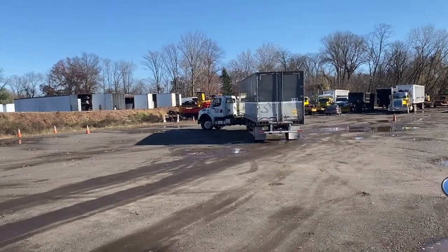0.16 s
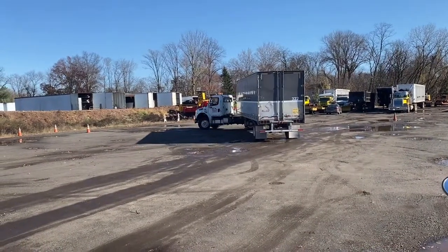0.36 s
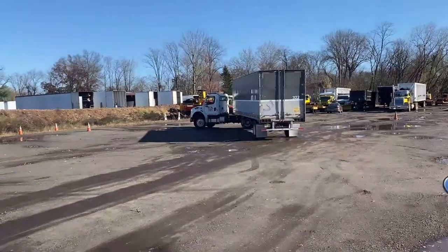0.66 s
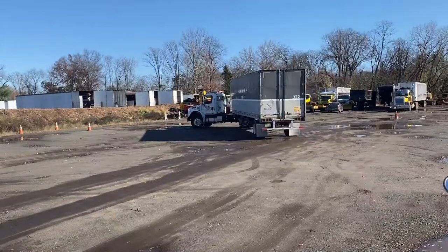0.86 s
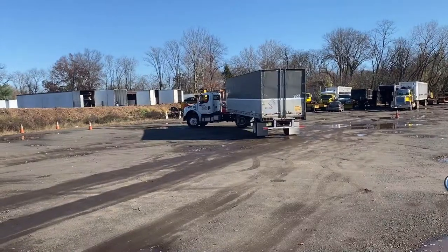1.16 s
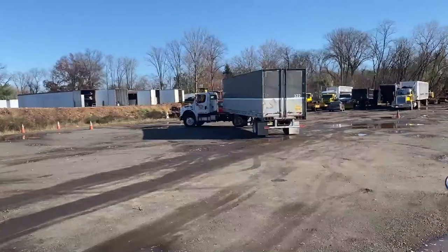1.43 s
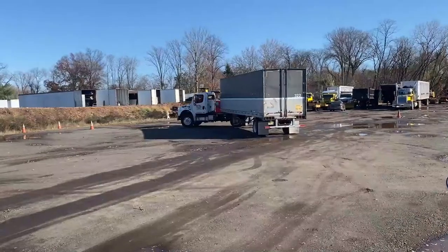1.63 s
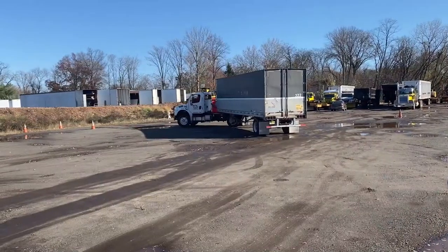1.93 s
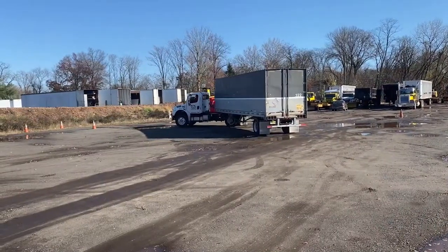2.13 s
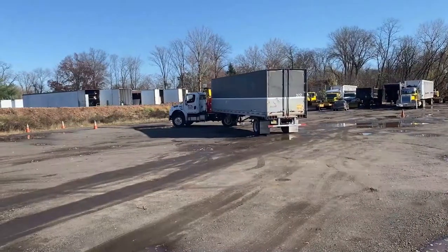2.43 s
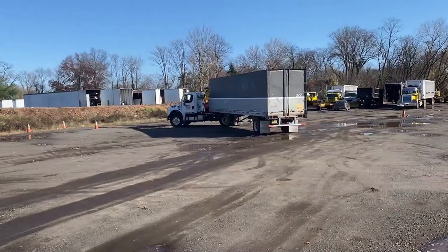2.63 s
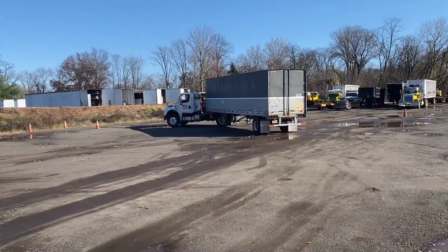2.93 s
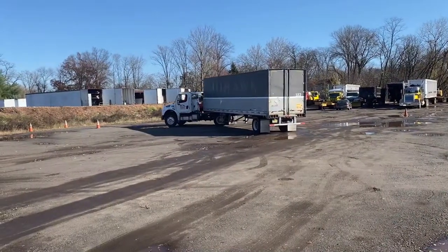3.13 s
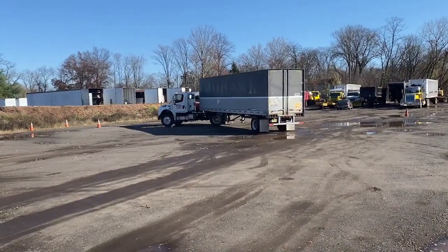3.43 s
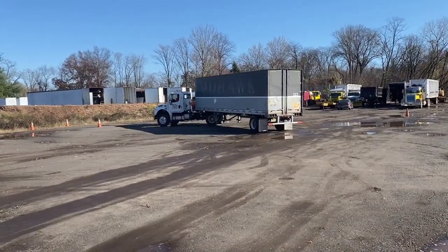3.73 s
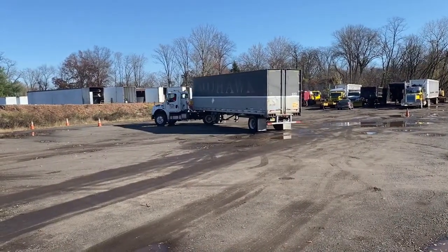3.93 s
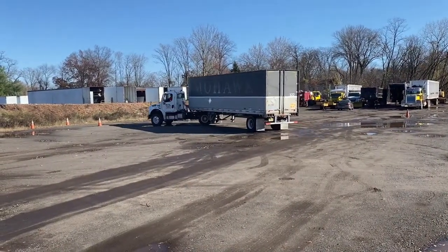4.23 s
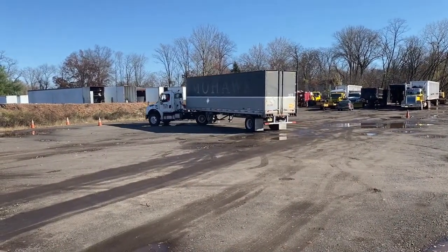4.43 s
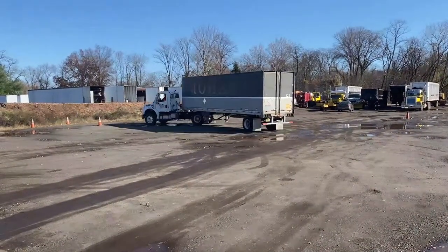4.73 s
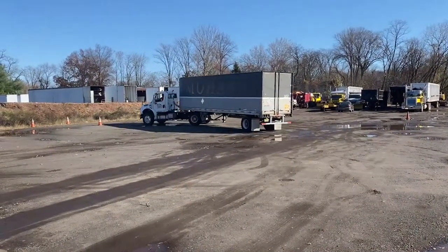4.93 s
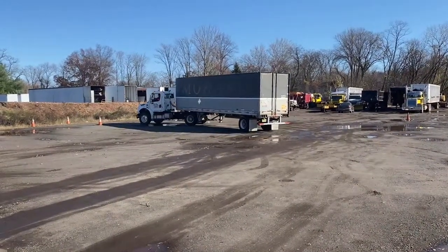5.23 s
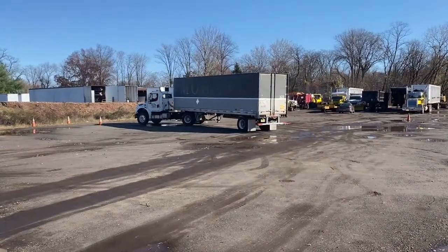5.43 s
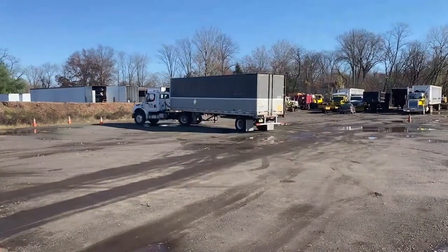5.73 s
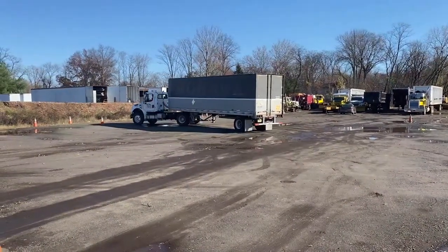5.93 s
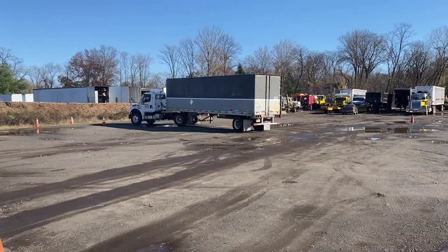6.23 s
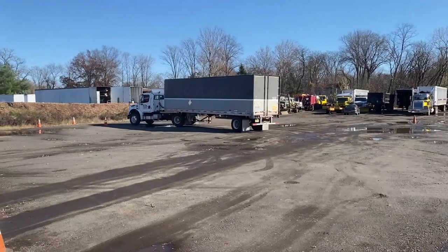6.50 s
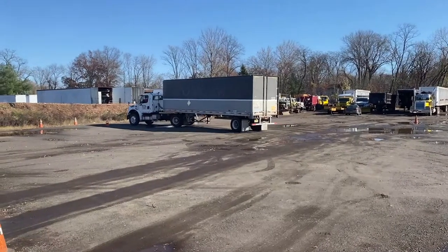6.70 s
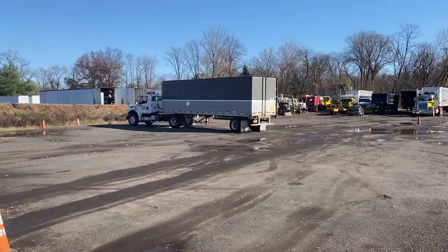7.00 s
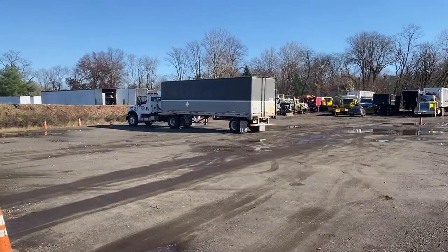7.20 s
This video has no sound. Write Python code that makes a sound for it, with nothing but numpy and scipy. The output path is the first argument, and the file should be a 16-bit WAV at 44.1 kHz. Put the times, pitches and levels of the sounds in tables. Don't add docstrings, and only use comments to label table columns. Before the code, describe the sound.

Outdoors in an open yard, a heavy diesel idles some thirty metres away, faint at first under flapping wind gusts on a phone microphone. As it turns, the exhaust boom, block knock, gear whine and panel buzz come forward. Dry trailer ticks and brief suspension squeaks follow mid-way, then wind thumps return strongly and brake air starts hissing at the very end.

```python
import sys
import numpy as np
from scipy import signal
from scipy.fft import rfft, irfft, next_fast_len
from scipy.io import wavfile
from scipy.ndimage import uniform_filter1d

SR = 44100
rng = np.random.default_rng(int(sys.argv[2]) if len(sys.argv) > 2 else 0)


def to_wav(s):
    ch = np.atleast_2d(s).T
    pcm = np.round(np.clip(ch, -1, 1) * 32767)
    wavfile.write(sys.argv[1], SR, pcm.astype(np.int16))


def attenuation_scalar(level_db):
    decades = np.asarray(level_db, float) / 20
    return 10 ** decades


N = 324576
T = np.arange(N) / SR
PAD = next_fast_len(N + int(SR) // 4)
HZ = np.maximum(np.fft.rfftfreq(PAD, 1 / SR), 1.)


def unit(x):
    return x / np.sqrt(np.mean(x ** 2))


def curves(table):
    s, *columns = np.transpose(table)
    return [np.interp(T, s, c) for c in columns]


def over_hz(table):
    hz, *columns = np.transpose(table)
    return [np.interp(np.log(HZ), np.log(hz), c) for c in columns]


def shape(x, gain):
    return irfft(rfft(x, PAD) * gain, PAD)[:N]


def low_pass(hz):
    return 1 / np.sqrt(1 + (HZ / hz) ** 8)


def band(x, hz, width_hz, order=1):
    b, a = signal.iirpeak(hz, hz / width_hz, fs=SR)
    for _ in range(order):
        x = signal.lfilter(b, a, x)
    return x


def steep(x, lo_hz, hi_hz):
    return signal.sosfilt(signal.butter(4, [lo_hz, hi_hz], "band", fs=SR, output="sos"), x)


def walk(rate):
    k = int(SR / rate)
    held = np.repeat(rng.standard_normal(N // k + 1), k)
    return 1.29 * uniform_filter1d(uniform_filter1d(held, k), k)[:N]


def add(out, at_s, burst):
    i = int(at_s * SR)
    out[i:i + len(burst)] += burst[:N - i]


def tone(hz, db, wobble, flicker_db, rate):
    level = np.sqrt(2) * attenuation_scalar(db + flicker_db * walk(rate))
    cycles = np.cumsum(hz * (1 + wobble * walk(rate))) / SR
    return level * np.sin(2 * np.pi * cycles)


def turned(away_db, facing_db):
    start_s, length_s = 1.92, 2.35
    return np.interp(T, [start_s, start_s + length_s], [away_db, facing_db])


# t/s, level/dB, brightness/dB
TRUCK = [
    (0, -61.5, -19),
    (.7, -61.5, -17),
    (1.75, -56.5, -13),
    (2, -51.5, -17),
    (3.2, -49.5, -15),
    (3.8, -48.5, -16),
    (5.6, -47, -17.5),
    (7, -44, -17),
    (7.36, -42, -15),
]


def engine_level():
    return curves(TRUCK)


CYLINDER_DB = [2, -4, 0, -5, 1, -2]


def firings():
    firing_hz = 38.75
    turns = np.cumsum(firing_hz * (1 + 0.002828 * walk(3))) / SR
    firing = turns.astype(int)
    uneven_db = rng.uniform(-4, 4, N // 500)[firing]
    size = attenuation_scalar(np.array(CYLINDER_DB)[firing % len(CYLINDER_DB)] + uneven_db)
    pulses = size * (np.diff(firing, prepend=0) > 0)
    return turns, size, pulses


# multiple of firing rate/x, level over the exhaust/dB
ORDERS_DB = [(2, -3.5), (3, -25.5), (4, -4.5), (5, -7), (7, -11), (8, -9)]
# f/Hz, width/Hz, level/dB
EXHAUST = [(73, 65, -2), (179, 55, -2), (262, 88, -4), (319, 58, -3), (409, 53, -8)]


def exhaust(turns, pulses):
    gas = unit(pulses) * 0.36 + rng.standard_normal(N)
    boom = 0
    for k, (hz, width_hz, db) in enumerate(EXHAUST):
        boom = boom + (-1) ** k * attenuation_scalar(db + 2.6 * walk(9)) * band(gas, hz, width_hz)
    muffler_hz, pipe_low_hz = 700, 58
    boom = shape(unit(boom), low_pass(muffler_hz) / np.sqrt(1 + (pipe_low_hz / HZ) ** 8))
    orders = 0
    for k, db in ORDERS_DB:
        orders = orders + attenuation_scalar(db + 3.85 * walk(11)) * np.sin(2 * np.pi * (k * turns + rng.random()))
    over_block_db = turned(-3.5, 4)
    return attenuation_scalar(engine_level()[0] + over_block_db) * (boom + orders)


# f/Hz, level per Hz/dB
BLOCK = [(300, -4.5), (480, 2.5), (640, -1.5), (820, 4), (1000, -3), (1300, -1.5), (1750, -7), (2500, -10),
         (3000, -20), (4200, -20.5), (5200, -27), (8000, -27), (11000, -36), (15500, -39)]
# f/Hz, width/Hz, level over the colour/dB
PANELS = [(840, 22.5, 7.3), (1145, 22, 3.5), (2495, 210, 4.3), (3000, 340, 0.72), (3260, 350, 2.1),
          (4200, 560, 0.4), (4820, 670, 5.4), (5370, 220, 2.8)]


def block(turns, size):
    knock_db, bright_db = engine_level()
    colour = attenuation_scalar(over_hz(BLOCK)[0])
    for hz, width_hz, db in PANELS:
        colour = colour * attenuation_scalar(db / (1 + (2 * (HZ - hz) / width_hz) ** 2))
    gate = size * np.exp(-(turns % 1) / 0.74)
    knock, shimmer = 0, walk(11)
    octaves = [(200, 1200, 1.8), (966, 2020, 0.95), (1770, 3030, 2.1),
               (3280, 4580, 0.88), (5880, 8640, 1.8), (8560, 13000, 1.5)]
    for lo_hz, hi_hz, fill in octaves:
        share = np.sqrt(1 / (1 + (lo_hz / HZ) ** 8) - 1 / (1 + (hi_hz / HZ) ** 8))
        rattle = (gate + fill) / (fill + 0.23) * rng.standard_normal(N)
        moving = attenuation_scalar(1.1 * walk(14) + 1.0 * shimmer)
        brightness = attenuation_scalar((bright_db + 18.0) * (lo_hz > 3000))
        knock = knock + shape(rattle, colour * share) * moving * brightness
    return attenuation_scalar(knock_db) * knock / np.sqrt(np.mean(colour ** 2))


def truck():
    turns, size, pulses = firings()
    return exhaust(turns, pulses) + block(turns, size)


# f/Hz, width/Hz, level over the block before the turn/dB, and after it/dB
BUZZ = [(3320, 440, -34, -19.5), (4800, 540, -31, -26), (2477, 250, -13, -19), (5470, 900, -25, -29),
        (3000, 1400, -19.5, -28)]


def buzz():
    out = 0
    for hz, width_hz, away_db, facing_db in BUZZ:
        level = attenuation_scalar(engine_level()[0] + turned(away_db, facing_db) + 2.1 * walk(10))
        out = out + level * unit(band(rng.standard_normal(N), hz, width_hz, order=2))
    return out


def wake(eddies, over_db, fade_s):
    build_s, lead_s = 0.0076, .08
    out, late = np.zeros(N), T[:12000] - lead_s
    puff = np.exp(2 * np.minimum(late / build_s, -late / fade_s))
    for s, db, hz in eddies:
        add(out, s + 1 / hz - lead_s, attenuation_scalar(2 * (db + over_db)) * puff)
    return out


# t/s, rumble level/dB
BREEZE = [(0, -48), (.7, -50), (1.9, -52.5), (2.6, -56), (3.3, -48.5), (4, -49), (5.7, -43), (6.4, -39.5),
          (6.8, -36.5), (7.24, -32), (7.36, -32.5)]
# t/s, peak level/dB, starting f/Hz
THUMPS = [(0.103, -30.5, 96), (.21, -33.5, 98), (0.32, -17, 123), (.457, -30, 86), (0.499, -21, 109.5),
          (0.515, -36, 84.5), (.64, -36.5, 99), (0.729, -44, 99.4), (0.754, -41, 121), (0.982, -34.5, 141),
          (1.192, -41.5, 90), (1.295, -39, 112), (1.953, -36, 114), (2.078, -39, 120), (2.133, -36, 109),
          (2.184, -46, 120), (2.291, -33, 108), (2.316, -51, 100), (2.445, -41, 110), (2.622, -33, 124),
          (2.636, -39.5, 110), (2.789, -34, 94.5), (2.814, -40, 130), (2.83, -42, 110), (4.116, -29.5, 105),
          (4.362, -31.5, 109), (5.79, -24.5, 132), (5.837, -22, 99), (5.849, -31, 110), (5.876, -21, 111),
          (5.959, -19.5, 123), (6.038, -28, 110), (6.09, -27, 90), (6.138, -18, 121), (6.181, -23.5, 117),
          (6.243, -24, 93), (6.316, -31.5, 84.7), (6.384, -26, 105), (6.486, -21.5, 99), (6.507, -20, 85),
          (6.535, -24, 150), (6.542, -19.5, 262), (6.544, -21.5, 142), (6.555, -17.5, 98.5),
          (6.589, -26, 150), (6.618, -23, 79.4), (6.652, -27, 86), (6.72, -31.5, 190), (6.894, -24.5, 98),
          (6.95, -27, 98), (7.121, -18, 89), (7.15, -32, 222), (7.181, -4, 131.5), (7.193, -7.5, 113.4),
          (7.213, -11, 167), (7.223, -16.5, 113), (7.234, -23, 83.6), (7.26, -19, 124), (7.288, -17, 127)]
# t/s, peak level/dB, starting f/Hz
BUFFETS = [(0.298, -27, 352), (.312, -18, 510), (0.337, -18.5, 525), (.352, -19.5, 330), (.366, -12.5, 330),
           (.369, -22, 760), (0.377, -17.5, 322), (.378, -23, 700), (.392, -40, 330), (0.404, -30, 460),
           (.409, -20.5, 260), (.42, -16, 206), (0.43, -23.5, 600), (.442, -12.5, 423), (.445, -19, 840),
           (0.453, -27.5, 374), (0.477, -27, 350), (.491, -25.5, 915), (.493, -11, 562), (.519, -36, 414),
           (.545, -40.5, 280), (0.586, -28.5, 317), (.591, -38, 645), (.604, -34, 250), (0.728, -48, 330),
           (0.74, -38, 450), (0.747, -32, 334), (.755, -29.5, 760), (.757, -29, 1410), (.764, -33.5, 330),
           (.768, -44, 600), (0.792, -45, 300), (0.804, -38.5, 450), (0.818, -47, 230), (.86, -42, 386),
           (.873, -35, 305), (0.925, -40, 620), (.973, -31.5, 775), (0.975, -30, 330), (0.996, -45.5, 380),
           (1.161, -32, 300), (1.17, -47, 262), (1.256, -45, 420), (1.264, -35, 261), (1.275, -32, 432),
           (1.337, -36, 336), (1.57, -40, 300), (1.945, -35.5, 200), (2.069, -32, 330), (2.157, -28.5, 251),
           (2.164, -36, 330), (2.18, -32.5, 300), (2.258, -44, 330), (2.384, -44, 330), (2.499, -33, 257),
           (2.509, -34, 300), (2.876, -36, 330), (2.96, -36, 382), (6.527, -17.5, 370), (7.165, -4.5, 269)]


def wind():
    breeze = attenuation_scalar(2 * curves(BREEZE)[0])
    wake_s, spit_s = 0.029, 0.0037
    low = np.sqrt(breeze + wake(THUMPS, -10.5, wake_s) + wake(BUFFETS, -12.5, wake_s))
    mid = np.sqrt(breeze * attenuation_scalar(2 * -1.5) + wake(THUMPS, -16, wake_s) + wake(BUFFETS, -13.5, wake_s))
    edge_on = [row for row in BUFFETS if row[0] < 1.1]
    spit = np.sqrt(wake(edge_on, -13, spit_s))
    lumps = walk(28)
    rumble = unit(steep(rng.standard_normal(N), 29.4, 127.4)) * attenuation_scalar(1.35 * lumps)
    flutter = unit(steep(rng.standard_normal(N), 134.0, 377.0)) * attenuation_scalar(2.0 * lumps + 1.4 * walk(55))
    fast = unit(band(steep(rng.standard_normal(N), 300.0, 866.0), 466.0, 140.0)) * attenuation_scalar(3.5 * walk(91.2))
    out = attenuation_scalar(-1.5) * (low * rumble + attenuation_scalar(-6.0) * mid * flutter) + attenuation_scalar(-2.0) * spit * fast
    t = T[:4000]
    for s, db, hz in THUMPS + BUFFETS:
        cycles = np.cumsum(hz * (0.33 + 0.78 * np.exp(-t * hz / 2.5))) / SR
        swell = cycles ** 2 * np.exp(2 - 2 * cycles / 0.94)
        add(out, s, attenuation_scalar(db - 1.5) * np.sin(2 * np.pi * cycles) * swell)
    port_top_hz = 1250
    return shape(out, low_pass(port_top_hz))


# t/s, peak level/dB, f/Hz, width/Hz
TICKS = [(.613, -70, 7800, 2500), (0.755, -52, 2200, 3000), (0.922, -56, 4430, 2000),
         (2.709, -53, 11000, 12000), (3.04, -62, 11500, 4000), (3.049, -44, 6500, 9000),
         (3.0495, -54, 13600, 5000), (3.158, -52, 7000, 4000), (3.255, -47.5, 7200, 2500),
         (3.257, -49, 4720, 1800), (3.296, -47.5, 4600, 1300), (3.303, -45, 4800, 1500),
         (3.304, -55, 7400, 2200), (3.309, -50, 5200, 2500), (3.31, -54, 7500, 2200),
         (3.425, -53, 5300, 1000), (3.46, -47, 4480, 1400), (3.461, -58, 7300, 2500),
         (3.635, -52, 9000, 12000), (3.636, -53, 14000, 4000), (3.642, -56, 12000, 6000),
         (3.655, -51, 8500, 5000), (3.665, -57, 11040, 5000), (4.122, -51, 4800, 1800),
         (4.465, -50.5, 4700, 1800), (4.684, -50, 5000, 2000), (5.12, -51, 4900, 2500),
         (5.962, -59, 4600, 3000)]


def ticks():
    out, t = np.zeros(N), T[:800]
    for s, db, hz, width_hz in TICKS:
        crack = band(rng.standard_normal(len(t)) * t * np.exp(-t / .0007), hz, width_hz, order=2)
        add(out, s, attenuation_scalar(db) * crack / np.abs(crack).max())
    return out


def gear():
    in_gear_s, engage_s = 1.87, 0.33
    throb_hz, throb_depth = 14.8, 0.54
    engaged = np.clip((T - in_gear_s) / engage_s, 0, 1)
    mesh = tone(330, engine_level()[0] + turned(-6.5, -1), .01, 3.8, 27)
    throb_cycles = np.cumsum(throb_hz * (1 + 0.076 * walk(3))) / SR
    return engaged * mesh * (1 + throb_depth * np.sin(2 * np.pi * throb_cycles))


def fan():
    return tone(95.8, turned(-85, -43), 0.004, 2.1, 20)


# start t/s, end t/s, starting f/Hz, final f/Hz, level over the block/dB
WHINES = [
    (2.083, 5.4, 930, 770, -10.5),
    (5.9, 7.6, 1000, 1142, -11),
    (2.75, 6.2, 219, 217, -9.5),
    (5.6, 8.5, 670, 830, -12.5),
    (5.5, 6.3, 525, 690, -14.5),
    (5.3, 6.65, 331, 331, -4),
]


def whines():
    out, fade_s = 0, 0.33
    for s, end, hz, end_hz, db in WHINES:
        swell = np.clip(np.minimum(T - s, end - T) / fade_s, 0, 1)
        out = out + swell * tone(np.interp(T, [s, end], [hz, end_hz]), db, .016, 4, 40)
    return out * attenuation_scalar(engine_level()[0])


# t/s, length/s, f/Hz, level/dB, share of pitch sagging mid-way/0-1
SQUEAKS = [
    (4.1, .058, 2835, -56.5, 0.004),
    (4.688, 0.076, 2880, -53.5, .035),
    (4.76, 0.033, 2830, -55.5, .004),
    (4.795, .03, 2830, -64, .004),
]
# multiple of the pitch/x, level/dB
SQUEAK_OVERTONES_DB = [(2, -27), (4, -31), (5, -29)]


def squeaks():
    out = np.zeros(N)
    for s, length, hz, db, sag in SQUEAKS:
        t = T[:int(length * SR)]
        arch = np.sin(np.pi * t / length)
        slip = .00004 * walk(200)[:len(t)]
        phase = 2 * np.pi * hz * (t + slip - sag * np.cumsum(arch ** 2) / SR)
        stack = np.sin(phase)
        for k, over_db in SQUEAK_OVERTONES_DB:
            stack = stack + attenuation_scalar(over_db) * np.sin(k * phase)
        level = np.sqrt(2) * attenuation_scalar(db + 5.2 * walk(130)[:len(t)])
        add(out, s, level * np.sqrt(arch) * stack)
    return out


# start t/s, rise/s, level/dB
AIR = (7.235, 0.02, -49.5)
# f/Hz, level per Hz/dB
AIR_COLOUR = [(800, -15.5), (2000, 0), (4000, -12.5), (5000, -10), (6000, -5.5), (8000, -17),
              (11000, -12.5), (15500, -17)]


def air():
    s, rise, db = AIR
    swell = attenuation_scalar(db) * np.clip((T - s) / rise, 0, 1)
    return swell * unit(shape(rng.standard_normal(N), attenuation_scalar(over_hz(AIR_COLOUR)[0])))


def ports(sound, table, comb=0):
    pan_db, lead, shared = over_hz(table)
    shared = np.clip(shared, 0, 1)
    scatter_s = 0.022
    scatter = rfft(rng.standard_normal(N) * np.exp(-T / scatter_s), PAD)
    side = 1j * scatter.real / np.abs(scatter) * np.sqrt(2 * (1 - shared) / (1 + shared))
    turn = attenuation_scalar(pan_db / 2) * np.exp(.5j * (lead - np.pi * comb))
    return np.array([shape(sound, (1 + side) * turn), shape(sound, (1 - side) / turn)])


# f/Hz, left minus right/dB, left lead/rad, shared share/0-1
PORTS = [(81, -1.5, -0.18, 0.98), (326, -4.5, 0.12, 0.91), (454, -9.5, 1.65, 0.62), (690, 0, 1.68, 1),
         (870, 1.5, 2.08, 0.97), (1022, 10.5, 1, 0.8), (1215, -2, 0.51, 0.53), (1750, 3.5, 1.75, 0.96),
         (2180, 0.5, 0.15, 0.67), (3000, 3.5, 0.85, 0.62), (4200, 3, 0.56, 1), (5800, 1.5, 0.52, 0.3)]
# f/Hz, left minus right/dB, left lead/rad, shared share/0-1
PORTS_TOP = [(6900, 1, 0, .9), (8200, 0, 0, .98), (15500, 0, 0, .99)]
# f/Hz, lag/half turns
COMB = [(6900, 0), (8200, .62), (8600, 1), (9500, 1), (9900, 1.6), (10800, 2), (12100, 2.5), (12600, 3),
        (13700, 3), (14100, 3.55), (15500, 3.7)]
# f/Hz, left minus right/dB, left lead/rad, shared share/0-1
WIND_PORTS = [(60, 0.096, -0.22, 0.87), (150, .3, -0.22, 0.77), (300, 0.46, -1.06, 1),
              (600, 0.41, -1.0, 0.89), (1500, 0.021, -1.3, 0.91)]


def scene():
    yard = truck() + buzz() + ticks() + gear() + fan() + whines() + squeaks() + air()
    return ports(yard, PORTS + PORTS_TOP, over_hz(COMB)[0]) + ports(wind(), WIND_PORTS)


def band_limit(x):
    return signal.sosfilt(signal.butter(12, 16450, fs=SR, output="sos"), x)


def record(dry):
    cut = signal.sosfilt(signal.butter(4, 36., "high", fs=SR, output="sos"), dry)
    cut = signal.sosfilt(signal.ellip(6, .5, 30, 15500., fs=SR, output="sos"), cut)
    return band_limit(cut)


dry = scene()
out = record(dry)
to_wav(out)
```